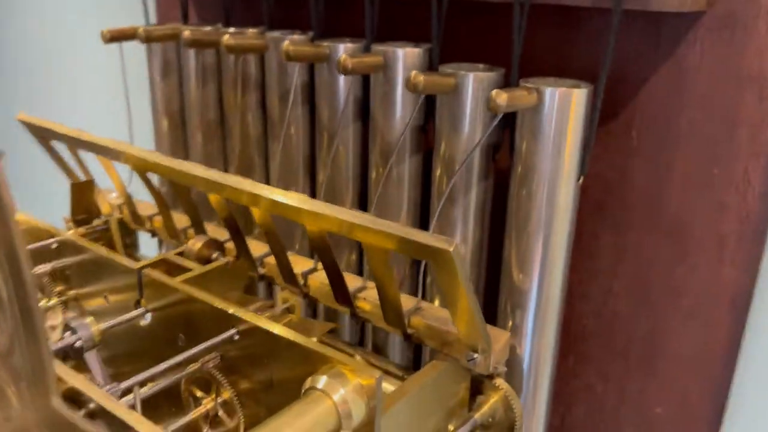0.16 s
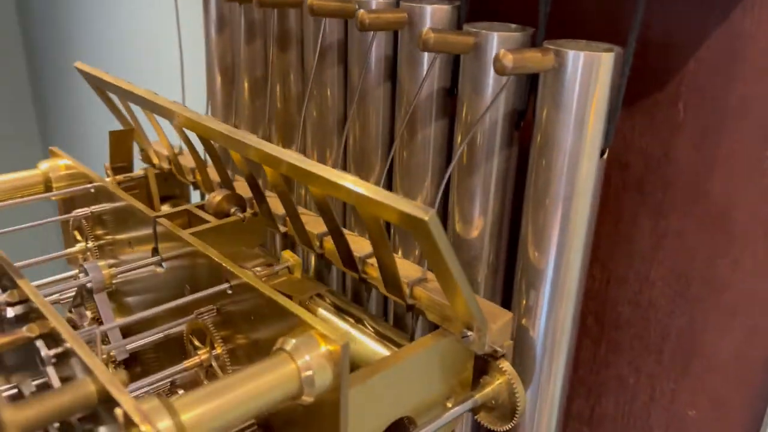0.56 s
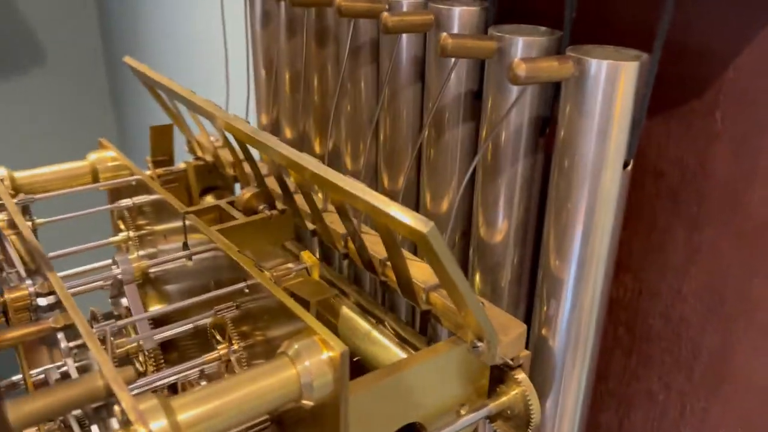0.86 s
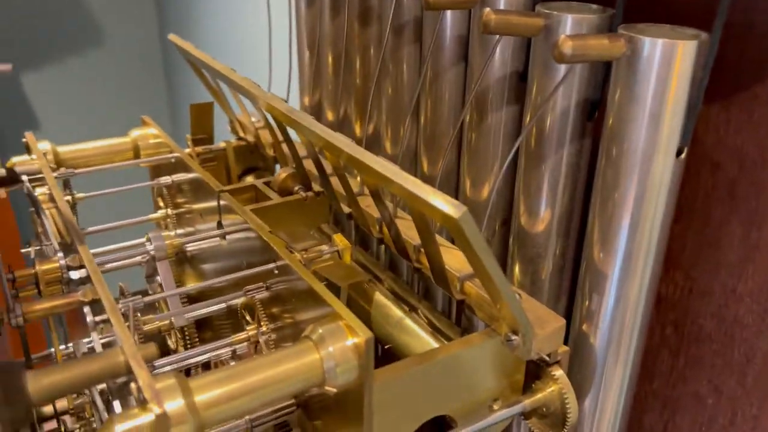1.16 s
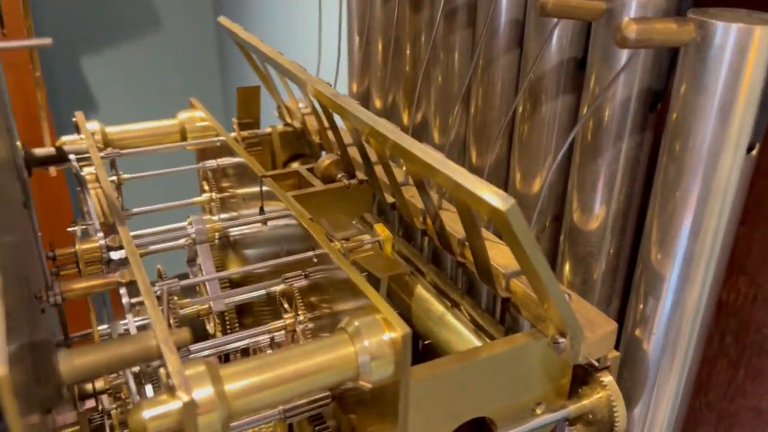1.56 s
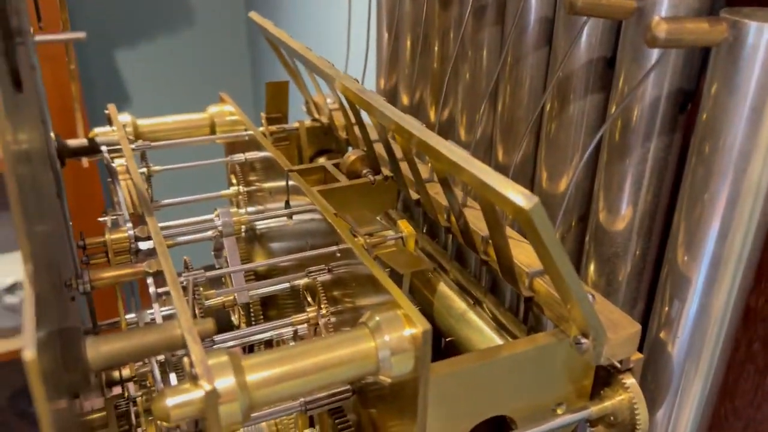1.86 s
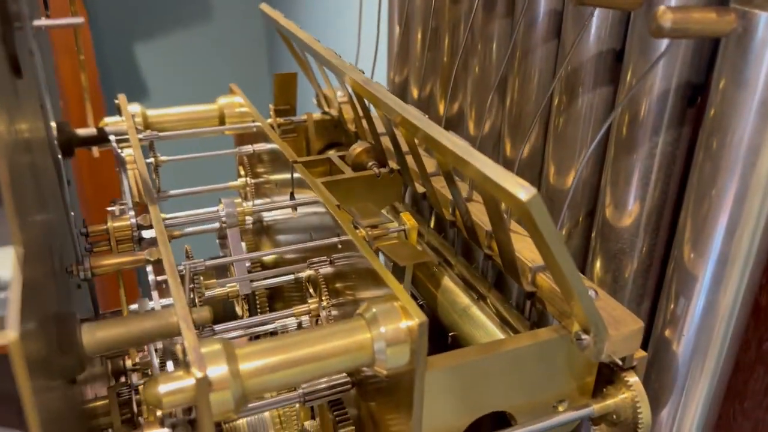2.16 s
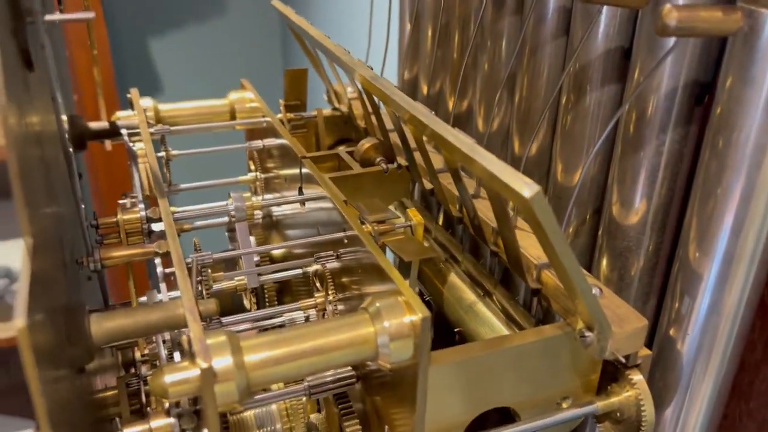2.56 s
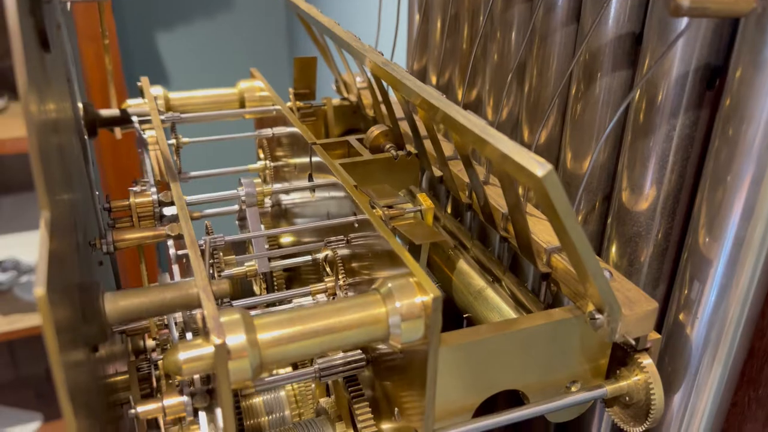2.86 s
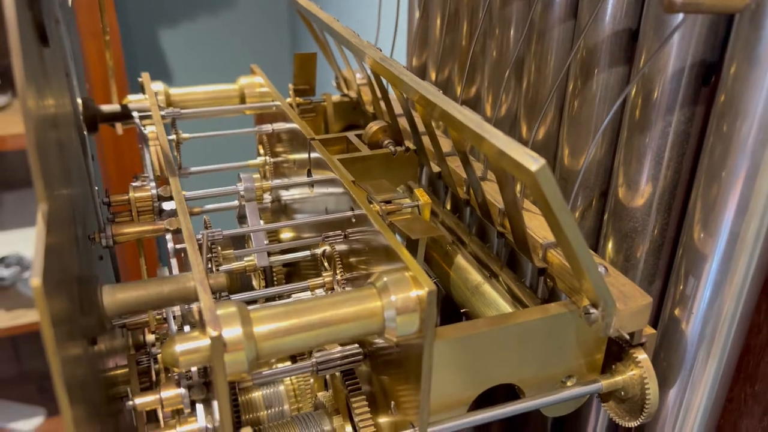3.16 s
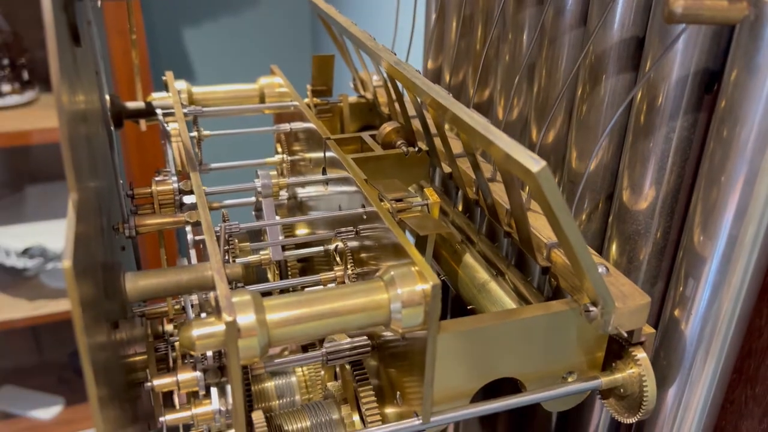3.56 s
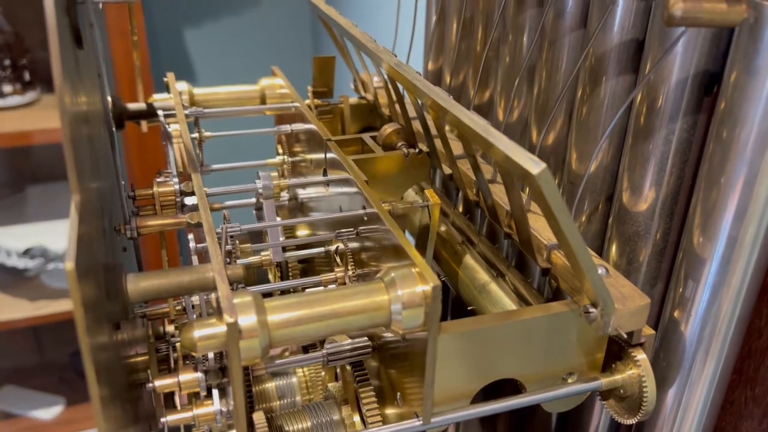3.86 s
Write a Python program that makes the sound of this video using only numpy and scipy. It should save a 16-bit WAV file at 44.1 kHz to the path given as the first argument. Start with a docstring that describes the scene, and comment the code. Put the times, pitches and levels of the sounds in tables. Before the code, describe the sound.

A clock movement ticks crisply at about 0.1, 1.1, 2.1 and 3.1 s, metal plates ringing briefly in a quiet, small-sounding room with low rumble and faint hiss. Close handling: soft rubbing, finger knocks near 0.5-0.6 and 1.6-2.05, bright case creaks at 2.2 and 2.7-2.9. Faint hum from 3.4. At 3.64 a release click, then a loud bouncing metal clack until 3.78, followed by whirring and quickening tiny gear taps.

```python
"""A brass clock movement close to a hand-held phone in a quiet room, over low rumble and microphone hiss.
Skin rubs and the hand pushes from the start; the escapement, as plates ringing on, ticks once a second.
Finger taps thump and knock on the phone in the first two seconds, then its case creaks in bright clicks.
A low hum sets in late; a lever lets go and bounces with a clack on the frame.
Out of the bounces comes a whirr of filtered noise, and wheel teeth tap a ringing pinion ever faster."""
import sys
import numpy as np
from scipy import signal
from scipy.fft import rfft, irfft
from scipy.io import wavfile
from scipy.ndimage import uniform_filter1d

SR = 44100
rng = np.random.default_rng(int(sys.argv[2]) if len(sys.argv) > 2 else 0)


def store_wav(level_fs):
    """Save 16-bit WAV to argv[1]."""
    pcm = np.round(np.clip(np.atleast_2d(level_fs), -1, 1) * 32767)
    wavfile.write(sys.argv[1], SR, pcm.T.astype(np.int16))


N = 176400
SHORT = 22050  # samples in one struck sound: half a second

# Blows of the dropping lever on the frame. Each row: start in seconds, ring in dB, rattle in dB.
BLOWS = [(3.656, -52.5, -34), (3.6635, -47.5, -27), (3.6776, -36.5, -20), (3.686, -46.5, -45),
         (3.719, -44.5, -23), (3.7416, -47.5, -32.5), (3.7565, -47, -32), (3.776, -64, -36)]
# Colour of the rattle in lever and wheels. Each row: frequency in Hz, level in dB.
CLACK_RATTLE = [(100, -55), (129, -8.5), (583, -13.5), (818, -23.5), (2270, -8), (3400, -18.5),
                (7770, -13.5), (12900, -9), (16000, -14.5)]
CLACK_CRACK_T60_S, CLACK_TAIL_T60_S, CLACK_TAIL_DB, CLACK_PAN_DB = 0.032, 0.14, -16.5, .5

RISE_S, DETUNE = 0.00059, 0.0016  # onset of struck sounds; spread of mode pitch as a fraction
ROUGH, ROUGH_S = .35, .006  # depth of the wavering as a fraction, and its grain
FLUTTER_DB, FLUTTER_HZ = 3.5, 500  # the reflections and the loose part flutter

HISS_MID_DB, HISS_SIDE_DB = -82.5, -83
RUMBLE_DB, RUMBLE_SIDE_DB = -68, -10.5  # the side is relative to the middle
HUM_HZ, HUM_DB, HUM_START_S, HUM_RISE_S = 100, -60.5, 3.37, 0.0095

TICK_CRACK_T60_S, TICK_TAIL_T60_S, TICK_TAIL_DB = 0.033, .3, -6
CASE_LAG_S, CASE_HZ = .022, 300  # the lag of the wooden case at this pitch

THUMP_HZ, THUMP_T60_S = 100, .06
THUMP_GLIDE, THUMP_GLIDE_S = 2.5, .005  # extra pitch at the start as a fraction, and its decay
KNOCK_T60_S, UPPER_KNOCK_HZ, SNAP_DB, TAP_PAN_DB = .007, 2190, -24, 4  # snap relative to knock
CREAK_T60_S, CREAK_TAIL_T60_S, CREAK_TAIL_DB, CREAK_PAN_DB = 0.016, 0.11, -16.5, 5

WHIRR_DB, WHIRR_HZ, WHIRR_WIDTH_HZ = -57.5, 1420, 1800
TRAIN_START_S, TOOTH_S, SPEED_UP_S = 3.886, .028, .002  # first gap, and how much each next one shrinks
TOOTH_RING_DB, TOOTH_RATTLE_DB = -60.5, -59.5

ROOM_T60_S, ROOM_DB, ROOM_LOW_HZ, ROOM_HIGH_HZ = 0.22, -5.5, 413, 5870
TAP_ROOM_DB = -10  # the taps' share in the room
LOW_LAG_CYCLES, TOP_HZ = 1.1, 15750


def undb(db):
    """Turns dB into an amplitude factor."""
    return 10 ** (np.asarray(db) / 20)


def noise(table, size=N):
    """Noise with the colour of (Hz, dB) points, rms 1."""
    f, points = np.fft.rfftfreq(size, 1 / SR) + 1, np.array(table)
    colour = undb(np.interp(np.log(f), np.log(points[:, 0]), points[:, 1]))
    x = irfft(rfft(rng.standard_normal(size)) * colour, size)
    return x / np.sqrt(np.mean(x ** 2))


def bandpass(order, low_hz, high_hz, x):
    """Passes what lies between two frequencies."""
    return signal.sosfilt(signal.butter(order, [low_hz, high_hz], "band", fs=SR, output="sos"), x)


def walk(rate):
    """A random line through levels drawn `rate` times a second; spread near 1."""
    k = int(SR / rate)
    steps = np.repeat(rng.standard_normal(N // k + 1), k)
    return uniform_filter1d(steps, k)[:N]


def fade(t60, size=SHORT):
    """A quick rise, then a loss of 60 dB in t60 seconds."""
    t = np.arange(size) / SR
    return np.exp(-np.log(1000) * t / t60) * (1 - np.exp(-t / RISE_S))


def ring(modes, scatter_db):
    """Decaying modes, each struck a little differently; loose parts make those above 200 Hz waver."""
    t, m = np.arange(SHORT) / SR, np.array(modes)
    chance = rng.standard_normal((len(m), 2))
    gain = undb(m[:, 1] + scatter_db * chance[:, 0])
    hz = m[:, 0] * (1 + DETUNE * chance[:, 1])
    k = int(ROUGH_S * SR)
    # sqrt(k) makes up for the spread lost in averaging
    rough = np.sqrt(k) * uniform_filter1d(rng.standard_normal((len(m), len(t))), k)
    waver = 1 + ROUGH * rough * (hz > 200)[:, None]
    return sum(a * w * fade(t60) * np.sin(2 * np.pi * f * t)
               for f, a, t60, w in zip(hz, gain, m[:, 2], waver))


def add(out, x, s, pan_db):
    """Adds a sound at a time in seconds, the left louder than the right by pan_db."""
    i = max(int(s * SR), 0)
    x = x[:N - i]
    out[:, i:i + len(x)] += x * undb(np.array([[pan_db], [-pan_db]]) / 2)


def rumble():
    """Uneven low noise of the room, mostly alike in both channels."""
    # Colour of the rumble. Each row: frequency in Hz, level in dB.
    colour = [(15, -33), (30, -8.5), (55, 2.5), (100, -6.5), (150, -8.5), (250, -24.5), (400, -55.5)]
    level = undb(RUMBLE_DB + 3 * walk(5))
    mid = level * noise(colour)
    side = undb(RUMBLE_SIDE_DB) * level * noise(colour)
    return np.array([mid + side, mid - side])


def hiss():
    """Steady microphone hiss, wide between the channels."""
    # Colour of the hiss. Each row: frequency in Hz, level in dB.
    colour = [(150, -45), (250, 1.5), (500, -5.5), (1300, -13), (5000, -20), (9000, -22), (16000, -94)]
    mid, side = undb(HISS_MID_DB) * noise(colour), undb(HISS_SIDE_DB) * noise(colour)
    return np.array([mid + side, mid - side])


def rubbing():
    """Skin and cloth stroke the phone: grainy noise swells, each with its own share of treble."""
    # Each row: three times in seconds that shape the swell, not always in order, level in dB,
    # treble against it in dB.
    strokes = np.array([(-.05, 0.01, 0.65, -78.5, -4.5), (0.192, 0.366, 0.42, -64.5, -1),
                        (0.471, 0.504, 0.51, -63.5, -8.5), (0.55, 0.777, 0.87, -68.5, -9.5),
                        (0.966, 1.086, 1.07, -73, -1), (1.421, 1.417, 1.477, -71, -9),
                        (2.426, 2.448, 2.445, -63.5, -7.5), (2.624, 2.75, 2.87, -68, -9)])
    # Colour of the rubbing. Each row: frequency in Hz, level in dB.
    colour = [(150, -5.5), (400, -5), (2000, -9.5), (8400, -14.5), (11700, -7), (16000, -14.5)]
    t, x = np.arange(N) / SR, noise(colour)
    low = signal.sosfiltfilt(signal.butter(2, 2800, fs=SR, output="sos"), x)
    treble = x - low
    swell = np.array([np.interp(t, row[:3], [0, 1, 0]) for row in strokes])
    low_level = undb(strokes[:, 3]) @ swell
    treble_level = undb(strokes[:, 3] + strokes[:, 4]) @ swell
    grain = undb(2 * walk(150) + walk(25))
    return grain * (low_level * low + treble_level * treble) * np.ones((2, 1))


def bumps():
    """Soft pushes of the hand on the phone: low noise under bell-shaped swells."""
    # Each row: middle in seconds, length in seconds, level in dB, top frequency in Hz.
    pushes = [(0.028, 0.039, -62.5, 132), (0.343, 0.11, -63.5, 97), (0.613, 0.039, -55, 148),
              (0.695, 0.042, -60.5, 137), (1.645, 0.1, -60.5, 83), (2.255, 0.23, -57.5, 121),
              (2.783, 0.074, -58, 156), (3.824, 0.18, -60, 71)]
    t, out = np.arange(N) / SR, 0
    for s, length, db, top_hz in pushes:
        x = bandpass(2, 35, top_hz, rng.standard_normal(N))
        x = x * np.exp(-2 * ((t - s) / length * 2) ** 2)
        out = out + undb(db) * x * np.sqrt(length * SR / np.sum(x ** 2))  # equal power over its length
    return out


def escapement():
    """A few quick contacts ring the plates and shake them; a loose part chatters after."""
    # Four ticks, then the lever's release. Each row: start in seconds, ring in dB, rattle in dB,
    # left over right in dB.
    ticks = [(0.097, -48, -46, .5), (1.088, -50, -52, 2.5), (2.098, -44, -47.5, 0.5),
             (3.091, -47.5, -52.5, 0.5), (3.640, -44, -47, 6)]
    # Contacts within a tick. Each row: seconds after the first, level in dB.
    contacts = [(0, -3), (.004, -2), (.011, -5)]
    # Modes of the plates under the escapement. Each row: frequency in Hz, level in dB, t60 in seconds.
    plates = [(263.7, -17.5, 0.26), (365, -12, 0.35), (447, -19.5, 0.4), (729, -14.5, 0.15),
              (882.6, 3, 0.058), (1050, -12, 0.045), (1187.4, -5.5, 0.096), (1501, -20.5, 0.45),
              (2228, 4.5, 0.099), (2232, -14.5, 0.035), (4130, -12.5, 0.04), (4664, -3, 0.043),
              (8790, -0.5, 0.031)]
    # Colour of the rattle. Each row: frequency in Hz, level in dB.
    colour = [(150, -16), (400, -8), (1000, -16.5), (1700, -22), (3100, -28), (4500, -24), (7800, -27),
              (9000, -14.5), (13800, -25.5), (16000, -38.5)]
    # Chatter of the loose part. Each row: start in seconds, level in dB.
    chatter = [(0.1073, -57.5), (1.1385, -69.5), (1.177, -69.5), (2.115, -64.5), (2.1995, -68),
               (3.114, -62.5), (3.159, -70)]
    # Modes of the loose part. Each row: frequency in Hz, level in dB, t60 in seconds.
    loose_part = [(5140, -1, 0.064), (6100, -4, 0.07), (6930, 4, 0.069), (11600, -11, 0.061),
                  (13700, -4, 0.072)]
    out = np.zeros((2, N))
    shape = fade(TICK_CRACK_T60_S) + undb(TICK_TAIL_DB) * fade(TICK_TAIL_T60_S)
    for s, ring_db, rattle_db, pan_db in ticks:
        for late, db in contacts:
            rattle = shape * noise(colour, size=SHORT)
            contact = undb(ring_db) * ring(plates, 2.3) + undb(rattle_db) * rattle
            add(out, undb(db) * contact, s + late, pan_db)
    for s, db in chatter:
        flutter = undb(db + 2 * FLUTTER_DB * walk(FLUTTER_HZ)[:SHORT])
        add(out, flutter * ring(loose_part, 3), s, 0)
    return out


def through_case(x):
    """The wooden case delays the lows more than the highs, so that each tick sinks in pitch."""
    f = np.fft.rfftfreq(N, 1 / SR)
    lag = CASE_LAG_S * (CASE_HZ / np.maximum(f, CASE_HZ / 1.5)) ** 3  # constant at the bottom
    cycles = np.cumsum(lag) * SR / N  # lag summed over frequency gives phase
    return irfft(rfft(x) * np.exp(-2j * np.pi * cycles), N)


def thump():
    """A low swing that starts high and drops at once."""
    t = np.arange(SHORT) / SR
    final_hz = THUMP_HZ * (1 + 0.14 * rng.standard_normal())
    hz = final_hz * (1 + THUMP_GLIDE * np.exp(-t / THUMP_GLIDE_S))
    return np.sin(2 * np.pi * np.cumsum(hz) / SR) * fade(THUMP_T60_S)


def taps():
    """Fingers tap the phone: a thump, two short knocks and a faint noisy snap."""
    # Each row: start in seconds, knock in dB, thump in dB, knock frequency in Hz, upper knock in dB.
    touches = [(.497, -41.5, -57.5, 660, -47.5), (0.603, -46.5, -55.5, 615, -60),
               (1.569, -52, -72, 710, -59.5), (1.628, -36, -48, 603, -47.5),
               (1.875, -33.5, -42.5, 610, -41), (1.944, -41, -52.5, 800, -78),
               (1.957, -52, -48.5, 950, -60), (2.034, -34.5, -46.5, 890, -52),
               (2.055, -35, -45.5, 740, -43.5)]
    out, t = np.zeros((2, N)), np.arange(SHORT) / SR
    for s, knock_db, low_db, hz, upper_db in touches:
        snap = undb(SNAP_DB) * rng.standard_normal(len(t))
        knock = undb(knock_db) * (np.sin(2 * np.pi * hz * t) + snap)
        upper = undb(upper_db) * np.sin(2 * np.pi * UPPER_KNOCK_HZ * t)
        add(out, undb(low_db) * thump() + (knock + upper) * fade(KNOCK_T60_S), s, TAP_PAN_DB)
    return out


def creaks():
    """The phone's case creaks: bright clicks with a short scratchy tail and a thump."""
    # Each row: start in seconds, click in dB before it is halved, low thump in dB.
    clicks = [(2.2172, -36.5, -45), (2.6753, -46, -83), (2.7129, -48.5, -58.5), (2.7487, -41, -58),
              (2.7546, -37, -60), (2.8355, -50, -89), (2.897, -61.5, -104)]
    # Colour of the clicks. Each row: frequency in Hz, level in dB.
    colour = [(180, -48), (300, 4.5), (584, -6), (2280, -3), (6620, -11.5), (14500, -19.5), (16000, -37)]
    out = np.zeros((2, N))
    shape = fade(CREAK_T60_S) + undb(CREAK_TAIL_DB) * fade(CREAK_TAIL_T60_S)
    for s, db, low_db in clicks:
        click = undb(db) / 2 * shape * noise(colour, size=SHORT)
        add(out, click + undb(low_db) * thump(), s, CREAK_PAN_DB)
    return out


def hum():
    """A low, slightly unsteady tone that sets in late and stays."""
    t = np.arange(N) / SR
    onset = np.clip((t - HUM_START_S) / HUM_RISE_S, 0, 1)
    return undb(HUM_DB + 2 * walk(8)) * onset * np.sin(2 * np.pi * HUM_HZ * t)


def clack(ring_db, rattle_db, modes):
    """A blow of metal: ringing modes and a rattle with a crack and a tail."""
    shape = fade(CLACK_CRACK_T60_S) + undb(CLACK_TAIL_DB) * fade(CLACK_TAIL_T60_S)
    rattle = shape * noise(CLACK_RATTLE, size=SHORT)
    return undb(ring_db) * ring(modes, 4.2) + undb(rattle_db) * rattle


def lever():
    """The dropped lever bounces, and each blow rings the frame."""
    # Modes of frame and case. Each row: frequency in Hz, level in dB, t60 in seconds.
    frame = [(126.8, -9, 0.6), (442.7, -16.5, 0.5), (591.2, -2, 0.3), (1170, -2, 0.088),
             (1490, -1.5, 0.064), (1577, -1, 0.093), (1757, -7, 0.083), (2233, -0.5, 0.05),
             (2540, 1.5, 0.059), (2705, -2, 0.087), (4370, 2, 0.045), (6826, -4, 0.042),
             (299.2, -9.5, 0.42)]
    out = np.zeros((2, N))
    for s, ring_db, rattle_db in BLOWS:
        add(out, clack(ring_db, rattle_db, frame), s, CLACK_PAN_DB)
    return out


def wheel_train():
    """A band of noise whirrs from the last blow on; wheel teeth tap a pinion at a quickening pace."""
    # Modes of the pinion. Each row: frequency in Hz, level in dB, t60 in seconds.
    wheel = [(1760, -6, 0.088), (2183, 3.5, 0.055), (4330, -5, 0.04), (4920, -4, 0.025)]
    out = np.zeros((2, N))
    low_hz, high_hz = WHIRR_HZ - WHIRR_WIDTH_HZ / 2, WHIRR_HZ + WHIRR_WIDTH_HZ / 2
    whirr = bandpass(2, low_hz, high_hz, rng.standard_normal(N))
    add(out, undb(WHIRR_DB) * whirr, BLOWS[-1][0], CLACK_PAN_DB)
    gaps = np.r_[0, TOOTH_S - SPEED_UP_S * np.arange(4)]
    for s in TRAIN_START_S + np.cumsum(gaps):
        add(out, clack(TOOTH_RING_DB, TOOTH_RATTLE_DB, wheel), s, CLACK_PAN_DB)
    return out


def between_microphones(x):
    """Turns the phase of the right channel against the left in the treble."""
    # Each row: frequency in Hz, lead of the left in radians.
    port_phase = np.array([(5000, 0), (8300, -1.3), (9000, -2.3), (11400, -4.4), (12400, -5.8),
                           (16000, -7.2)])
    f = np.fft.rfftfreq(N, 1 / SR)
    lead = np.interp(f, *port_phase.T)
    return np.array([x[0], irfft(rfft(x[1]) * np.exp(-1j * lead), N)])


def room(x):
    """Reflections as decaying noise, different left and right, with a fluttering level."""
    echo = bandpass(1, ROOM_LOW_HZ, ROOM_HIGH_HZ, rng.standard_normal((2, SHORT))) * fade(ROOM_T60_S)
    echo = echo / np.sqrt(np.sum(echo ** 2, axis=1, keepdims=True))
    wet = signal.fftconvolve(x.mean(axis=0)[None], echo, axes=1)[:, :N]
    flutter = np.array([walk(FLUTTER_HZ), walk(FLUTTER_HZ)])
    return undb(ROOM_DB + FLUTTER_DB * flutter) * wet


def scene():
    """Clock and hand close by, their reflections, and the quiet room beneath."""
    clock = through_case(escapement()) + lever() + wheel_train()
    near = between_microphones(rubbing() + clock + creaks())
    tapping = taps()
    background = rumble() + hiss() + bumps() + hum()
    return near + tapping + room(near + undb(TAP_ROOM_DB) * tapping) + background


def record(dry):
    """The phone lets the lows come late and cuts the top."""
    f = np.fft.rfftfreq(N, 1 / SR) + 20
    # a phase along log frequency delays each pitch by about the same number of cycles
    late = irfft(rfft(dry) * np.exp(-2j * np.pi * LOW_LAG_CYCLES * np.log(f)), N)
    return signal.sosfilt(signal.ellip(8, .2, 70, TOP_HZ, fs=SR, output="sos"), late)


dry = scene()
out = record(dry)
store_wav(out)
```